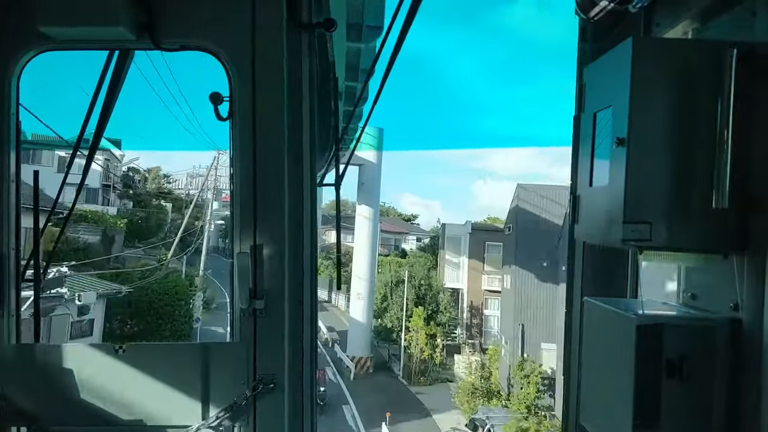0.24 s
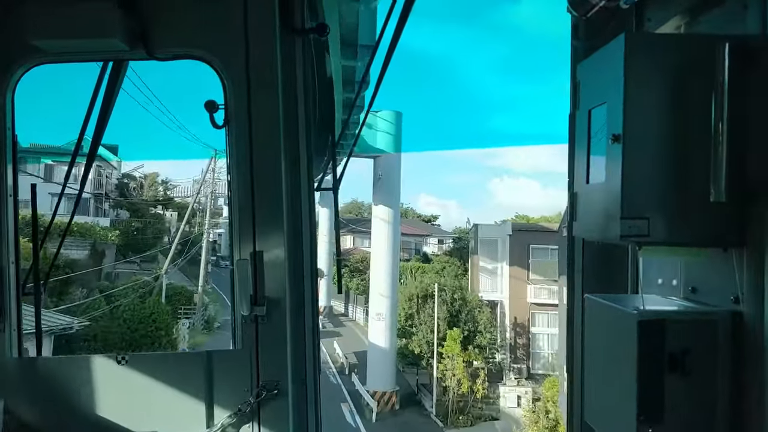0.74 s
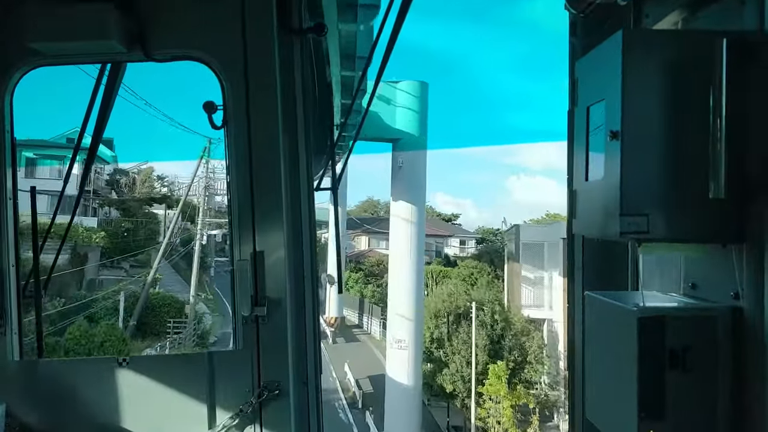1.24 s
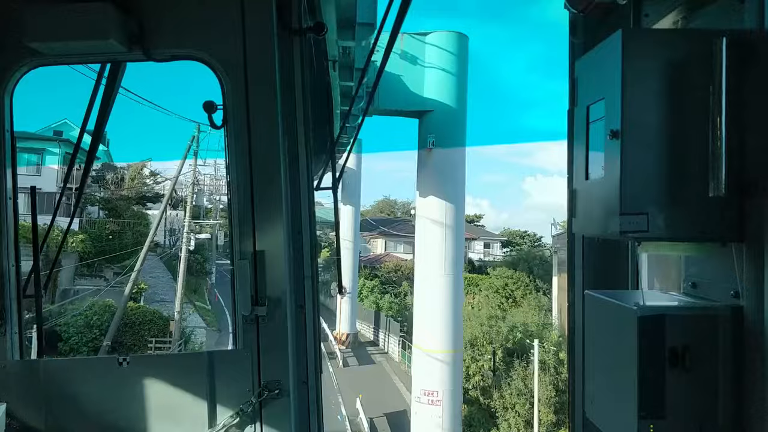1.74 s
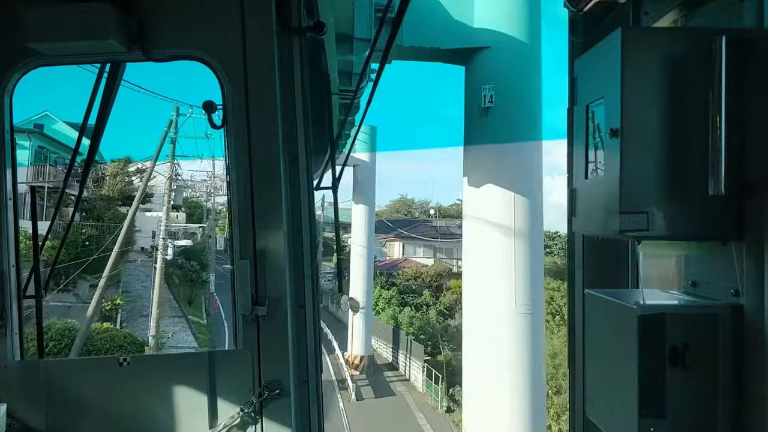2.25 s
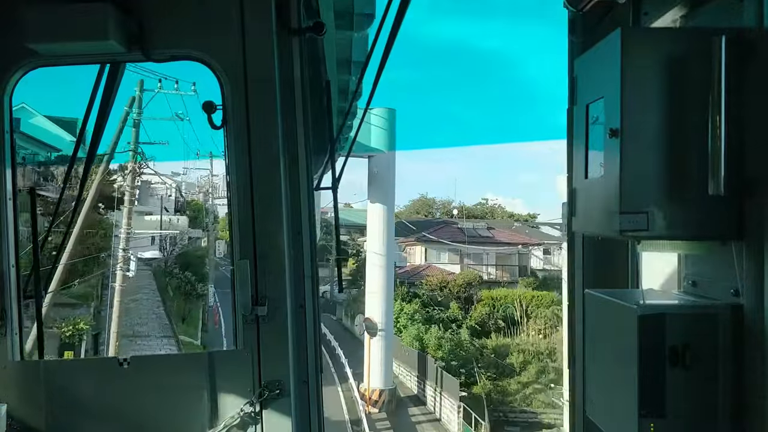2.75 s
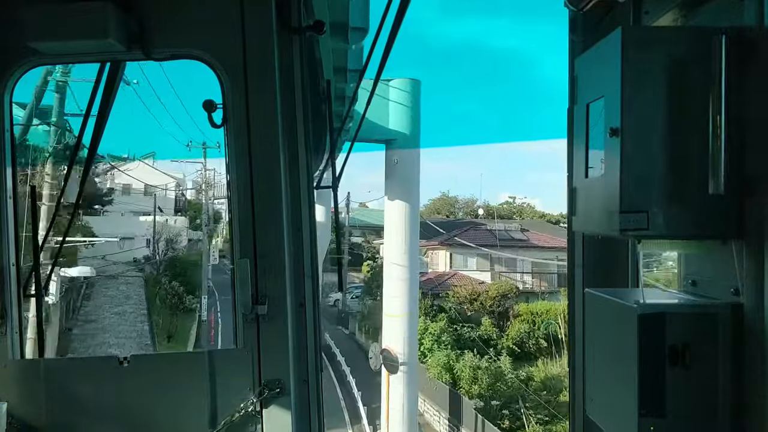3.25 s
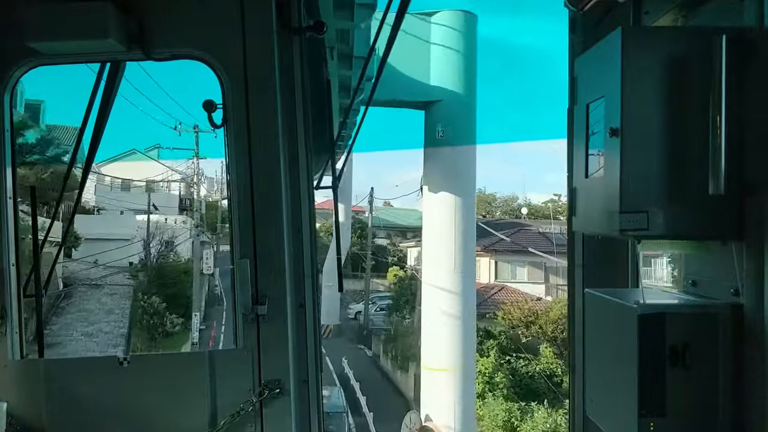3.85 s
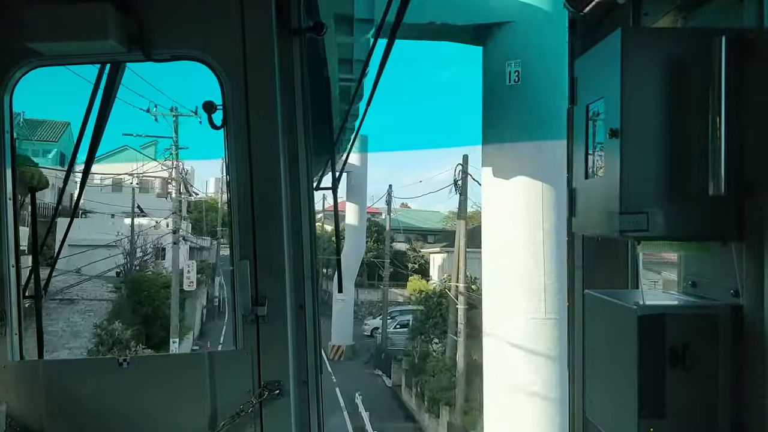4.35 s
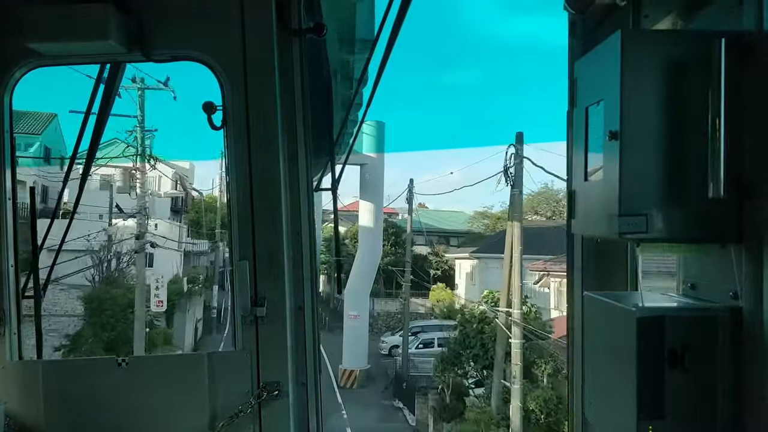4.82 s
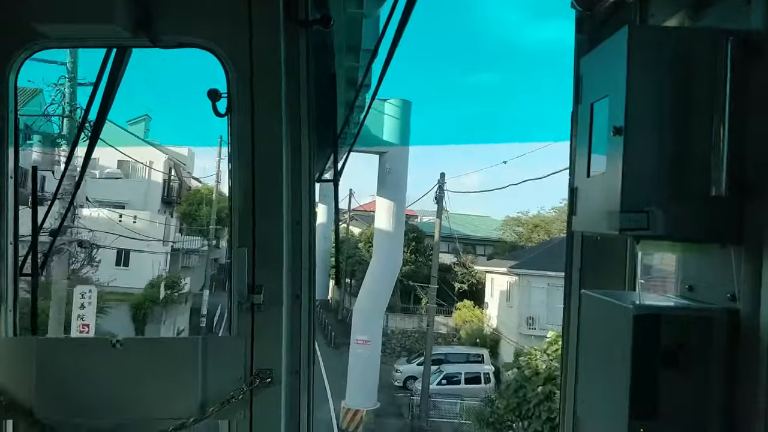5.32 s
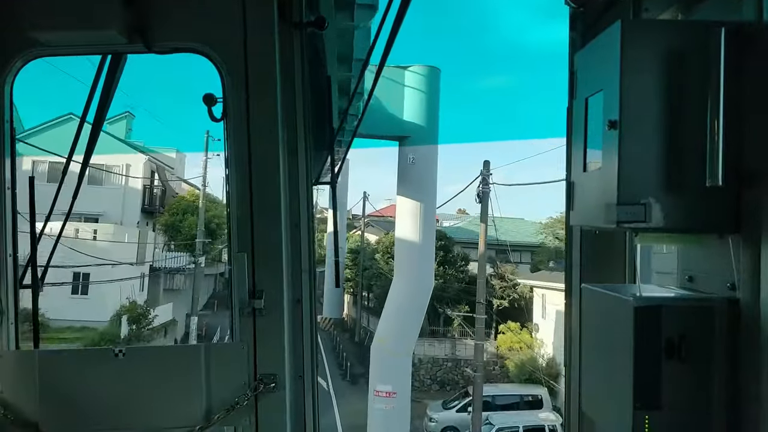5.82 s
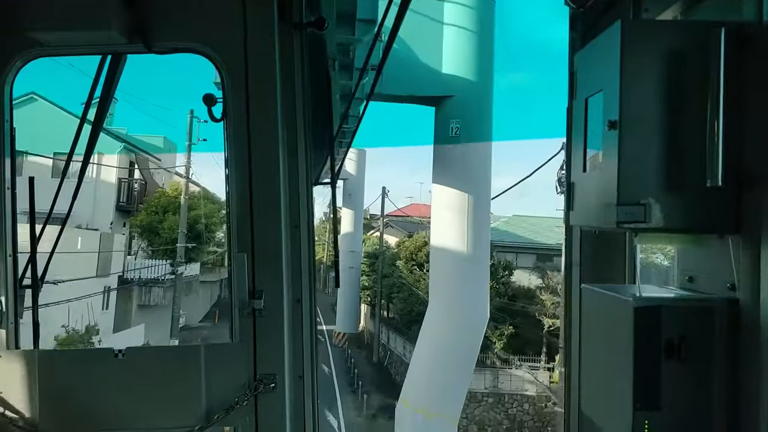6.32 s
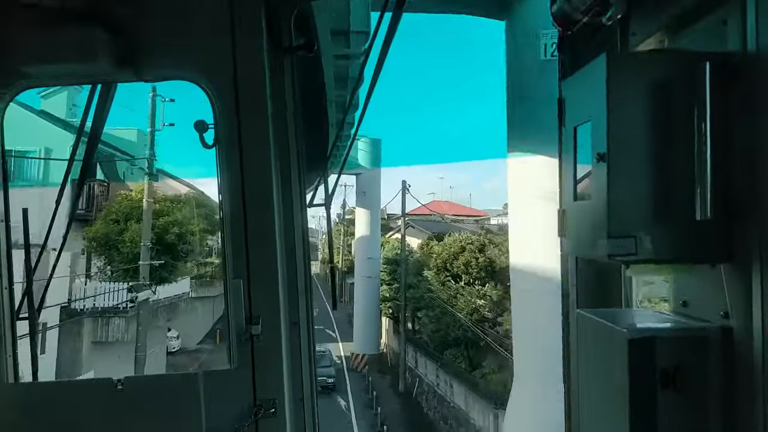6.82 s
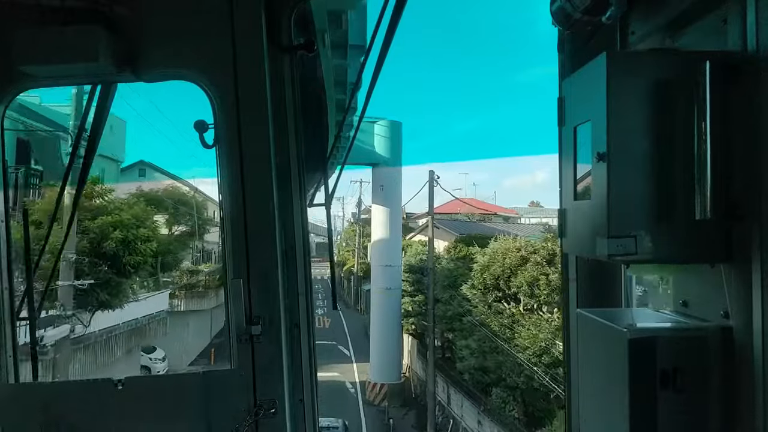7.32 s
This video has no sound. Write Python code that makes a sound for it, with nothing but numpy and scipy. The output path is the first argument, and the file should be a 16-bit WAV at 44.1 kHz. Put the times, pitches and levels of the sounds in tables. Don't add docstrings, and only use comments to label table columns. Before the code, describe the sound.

Low, swaying train rumble fills a cabin while wheel bumps knock the panels and close trim clicks, rubs and rattles over soft air hiss.

```python
import sys
import numpy as np
from scipy import signal
from scipy.fft import rfft, irfft, next_fast_len
from scipy.io import wavfile
from scipy.ndimage import uniform_filter1d

SR = 44100
rng = np.random.default_rng(int(sys.argv[2]) if len(sys.argv) > 2 else 0)


def boost_factor(decibels):
    exponent = np.asarray(decibels, float) / 20
    return 10 ** exponent


def materialize(psi):
    bounded = np.clip(np.atleast_2d(psi).T, -1, 1)
    quanta = np.round(bounded * 32767).astype(np.int16)
    wavfile.write(sys.argv[1], SR, quanta)


N = 333837

# frequency in Hz, level in dB per Hz.
AIR_SPECTRUM = [(1120, 3), (1900, 3.5), (2720, 1), (3810, 2), (5050, -0.5), (6140, -8), (7090, -8),
                (8500, -18), (11000, -61), (18700, -120)]
# frequency in Hz, level in dB per Hz.
FIZZ_SPECTRUM = [(3000, -99), (7000, -35), (8700, -19.5), (10300, -12), (12000, -10), (14500, -10),
                 (16000, -15)]
# frequency in Hz, level in dB per Hz.
SWAY_SPECTRUM = [(8, -25), (18, -1), (30, 0), (42, -2), (54, -30), (90, -130)]
# frequency in Hz, level in dB per Hz.
HUM_SPECTRUM = [(12, -130), (36, -30), (46, -5), (53, -4), (59, 0), (66, -3), (82, -5), (100, -13),
                (125, -40), (200, -130)]
# frequency in Hz, level in dB per Hz.
TYRE_SPECTRUM = [(53, -19), (90, -1), (241, -7.5), (357, -8), (385, -10), (454, -16), (496, -14),
                 (623, -14), (834, -27.5), (900, -22), (1050, -27.5), (1850, -39), (2400, -85),
                 (4070, -120)]
# frequency in Hz, width in Hz, rise in dB.
PANEL_MODES = [(170, 25, 4), (388, 10, 9), (497, 24, 7), (555, 20, 3), (640, 20, 8), (740, 30, 5),
               (890, 25, 5)]
# time in seconds, beam roughness in dB, cabin shaking in dB.
RIDE_ALONG_BEAM = [(0, -3.5, -0.5), (.34, -2, 0), (.91, -3.5, -2), (1.43, 4, 2), (1.94, -2, -1.5),
                   (2.75, -1.5, -1.5), (3.4, -5, -1), (3.86, 3, -2), (4.2, -1.5, -1.5), (4.64, 2.5, 1.5),
                   (4.95, -3.5, -2), (5.4, 3.5, 4.5), (5.75, -3.5, 0.5), (6.07, 5.5, 2), (6.68, -1, 3),
                   (6.92, -1, 0), (7.25, 0.6, -1), (7.57, -5.5, -6.5)]
# start in seconds, peak in dB, ring in Hz.
WALL_KNOCKS = [(0.185, -10, 498), (1.114, -10.5, 457), (1.431, -8.5, 587), (1.593, -7, 511),
               (2.14, -12.5, 501), (2.386, -12, 617), (2.472, -12, 472), (2.765, -12.5, 534),
               (3.416, -12, 633), (3.645, -13, 633), (3.752, -3, 527), (3.878, -5, 607), (4.381, -4.5, 507),
               (4.707, -8, 430), (5.313, -5.5, 450), (5.445, -10, 636), (5.638, -7.5, 493),
               (5.95, -6.5, 503), (6.065, -3.5, 538), (6.09, -10.5, 520), (1.452, -9.5, 603),
               (4.685, -10, 555), (4.405, -9.5, 484), (5.975, -12, 437), (6.285, -12, 635),
               (4.025, -13, 597), (1.522, -16, 560), (4.134, -15.5, 600), (4.259, -13.5, 637),
               (6.631, -14, 562), (6.332, -18, 596), (6.408, -7, 537), (6.451, -7, 493), (6.513, -4.5, 496),
               (6.576, -8, 497), (7.078, -9, 493)]
# start in seconds, peak in dB, ring in Hz.
FLOOR_THUDS = [(0.24, -13, 292), (0.3, -15.5, 275), (0.43, -20, 207), (2.3, -15, 280), (3.67, -13.5, 235),
               (1.83, -18, 204), (2.16, -17, 175), (6.04, -9.5, 298), (6.36, -9, 264), (0.359, -13, 356),
               (0.949, -11.5, 412), (1.06, -12.5, 296), (1.257, -13.5, 323), (1.298, -9, 280),
               (1.518, -22, 355), (1.652, -13, 258), (1.735, -10, 393), (1.998, -12.5, 330),
               (2.251, -19, 386), (2.718, -17, 407), (3.02, -16, 396), (3.484, -11.5, 316),
               (4.003, -9.5, 406), (4.129, -15.5, 342), (4.15, -11, 395), (4.428, -15, 392),
               (4.5, -11.5, 286), (4.65, -13, 363), (4.803, -13, 288), (4.925, -12, 356),
               (5.051, -11.5, 268), (5.189, -10, 337), (5.407, -12.5, 256), (5.506, -7, 288),
               (5.599, -15, 360), (5.658, -6.5, 432), (5.726, -19, 414), (6.088, -15, 410),
               (6.129, -13.5, 265), (6.595, -9.5, 290), (6.63, -14, 300), (6.858, -12, 260),
               (7.357, -12, 335), (7.439, -20, 420)]
# start in seconds, peak in dB, centre in Hz, length in seconds.
TRIM_RUSTLES = [(1.425, -48, 3800, 0.045), (3.765, -41, 4000, 0.05), (5.609, -39.5, 3980, 0.07),
                (5.652, -43.5, 4000, .05), (5.935, -40, 3800, 0.07), (6.63, -44, 5000, .025),
                (6.675, -43, 4500, 0.083), (6.81, -42, 4400, .06), (6.937, -54, 3500, .03),
                (4.498, -41, 4200, 0.057), (5.029, -45, 4500, 0.033), (7.043, -45, 3480, 0.057),
                (7.083, -42.5, 3200, 0.061)]
# start in seconds, peak in dB, brightness in dB.
LEFT_SNAPS = [(.2523, -31, -16), (.3177, -32, -11), (.5272, -26.5, -8.5), (.6265, -30.5, -16),
              (.7053, -31, -21), (.9332, -28, -17), (1.0595, -25, -18), (1.614, -29, -21),
              (1.7933, -22.5, -14.5), (2.2293, -30, -16), (2.2947, -41, 2), (2.371, -35, -9),
              (2.5722, -32, -10), (2.8195, -24.5, -9), (3.0126, -26, -18), (3.3613, -24.5, -21),
              (3.8496, -42, -3), (4.0602, -25.5, -16), (4.3959, -23.5, -16), (4.4687, -31.5, -10),
              (4.5511, -27.5, -13), (4.8748, -40, -7), (4.9254, -25.5, -13), (5.1208, -29, -16),
              (5.1906, -20, -15.5), (5.3538, -28.5, -1), (6.2987, -30.5, -10), (7.012, -24.5, -18),
              (7.3582, -30, -14)]
# start in seconds, peak in dB, brightness in dB.
RIGHT_SNAPS = [(.1511, -29, -19), (.8664, -36, -14), (4.6458, -28, -14), (5.0955, -31, -10),
               (6.5799, -36, -4), (6.638, -50, 2), (6.68, -42, 2), (7.097, -31, -16), (7.3495, -29, -8),
               (1.682, -34, -16), (4.917, -38, -2), (5.321, -38, 0), (7.54, -38, -8), (6.412, -42, -3),
               (4.013, -36, -10), (7.4135, -44, -12), (1.9974, -32, -11), (2.0812, -34, -14),
               (2.641, -25, -26), (2.7003, -37, -24), (3.3019, -33, -14), (3.5124, -32, -7),
               (3.9872, -41, -10), (4.2547, -50, -3), (5.036, -43, -3), (5.0517, -25.5, -15),
               (5.079, -24.5, -4), (5.1537, -37, 8), (5.6131, -33, -3), (5.9214, -42, 5),
               (6.3765, -24, -26), (6.5111, -22, -15), (6.9481, -28, -19)]
# start in seconds, peak in dB, lowest mode in Hz, brightness in dB,
# left minus right in dB.
DULL_TAPS = [
    (5.133, -22.5, 1500, -23, 8),
    (5.4385, -19, 1160, -24, -2),
    (5.505, -19.5, 1120, -22, 2),
]
# start in seconds, peak in dB, 60 dB decay in seconds.
CLIP_PINGS = [(.2129, -42, 0.11), (.7193, -47, 0.031), (1.6242, -45, .13), (1.7654, -44, 0.33),
              (1.8297, -41.5, 0.21), (2.1011, -41, .11), (2.1485, -39, 0.044), (2.2069, -42, .035),
              (2.2383, -38, .09), (2.3645, -39.5, 0.17), (2.5107, -41, 0.044), (2.6165, -43, .035),
              (2.821, -32.5, 0.26), (3.0011, -42, .14), (3.1113, -43, .04), (3.4481, -42, .09),
              (3.713, -39, 0.11), (4.157, -44, 0.038), (4.2237, -33, 0.12), (4.509, -34, 0.096),
              (4.7386, -39, .09), (4.7566, -42, 0.21), (4.918, -36.5, 0.11), (4.581, -52, .035),
              (5.076, -43, 0.032), (5.386, -39, .04), (5.459, -47, .3), (5.602, -38, 0.17),
              (5.662, -42, 0.18), (6.1399, -43, 0.27), (1.94, -46, .05), (2.729, -48, .04),
              (2.783, -46, .05), (2.867, -43, .05), (2.989, -46, .03), (3.902, -51, .04), (4.47, -49, .04),
              (4.087, -48, .05), (5.319, -36, .06), (6.272, -42, .1), (6.532, -39, .05), (6.71, -41, 0.22),
              (6.783, -39, 0.13)]
# start in seconds, peak in dB, 60 dB decay in seconds.
FITTING_CHATTERS = [(0.042, -38, 0.2), (.28, -44, .3), (.3491, -36, 0.13), (.9363, -41, .3),
                    (1.3518, -33, 0.2), (2.2952, -43, .3), (2.8659, -44, .3), (3.299, -34, 0.35),
                    (3.499, -32.5, 0.39), (3.6157, -45, .3), (3.753, -39, .15), (3.776, -33, 0.43),
                    (4.065, -49, .3), (4.257, -33.5, .3), (4.384, -33, 0.38), (4.786, -33.5, 0.2),
                    (5.128, -49, .2), (5.1527, -35, .25), (5.234, -39, .3), (5.266, -45, .3),
                    (5.355, -35, .3), (5.5159, -44, .3), (5.715, -34, .3), (5.92, -33, 0.36),
                    (6.0153, -35.5, .3), (6.227, -38.5, .25), (6.4812, -41, .3), (6.5834, -37, 0.32),
                    (6.672, -43, 0.45), (7.062, -46, .3), (7.0883, -38, 0.22), (7.124, -33, .3),
                    (7.271, -32, 0.18), (7.522, -34, 0.18)]
# start in seconds, peak in dB, pitch in Hz, length in seconds.
FITTING_SQUEAKS = [
    (0.276, -48, 13500, 0.068),
    (0.592, -54, 13500, 0.019),
]
# frequency in Hz, side minus mid in dB.
STEREO_SPREAD = [(42, -25), (65, -17), (125, -8), (250, -5.7), (500, -5.2), (1000, -.3), (16000, 0)]
# frequency in Hz, left minus right in dB.
PORT_MISMATCH = [(25, .5), (60, 1), (200, 2), (600, 1.5), (1300, .3), (4400, .8), (9500, 0), (12500, 6),
                 (14500, 11.5), (15600, 8)]

AIR_DB, FIZZ_DB, FIZZ_FOLLOWS = -44.5, -59, 1.6
SWAY_DB, HUM_DB, ROAR_DB = -17.5, -18.5, -19
HUM_GROWS_DB_PER_S, HUM_FOLLOWS = 0.26, 0.066
FLOOR_TOP_HZ, FLOOR_FOLLOWS, WALLS_FOLLOW = 280, 0.79, 0.72
DRONE_HZ, DRONE_WANDER_HZ, DRONE_DB, DRONE_FROM_S, DRONE_RISE_S = 58.3, 1.1, -21, 2.2, 1.2
RING_HZ, RING_SHARE, DULL_HZ, BUZZ_LATE_S = 633, 0.36, 713, 0.0011
LEFT_HZ, LEFT_PAN_DB, RIGHT_HZ, RIGHT_PAN_DB, TRIM_SPREAD = 2260, 13.5, 2060, -1.5, 0.023
RING_T60_S, MODE_RING, TRIM_TOP_HZ = 0.015, 0.55, 6900
PING_HZ, CHATTER_HZ, TICK_T60_S, SWELL_S = 10600, 14400, 0.017, 0.0022
SOFT_DB, HZ_PER_DB, FRAME_DB, FRAME_PER_DB = -34.5, 103, 3, 2.45


def evened(x):
    return x / np.sqrt(np.mean(x ** 2) + 1e-20)


def smooth_twice(x, size):
    return uniform_filter1d(uniform_filter1d(x, size=size), size=size)


def read(points, hz):
    f, value = np.transpose(points)
    return np.interp(np.log(hz + 1), np.log(f + 1), value)


def level(db, follows, order):
    rows = np.array(RIDE_ALONG_BEAM)
    return boost_factor(db + follows * np.interp(np.arange(N) / SR, rows[:, 0], rows[:, order]))


def add(mix, s, sound):
    part = mix[:, max(round(s * SR), 0):][:, :sound.shape[-1]]
    part += sound[:, :part.shape[1]]


def band(x, hz, width):
    return signal.lfilter(*signal.iirpeak(min(hz, .45 * SR), hz / width, SR), x)


def twice(x, hz, width, second_hz, second_width):
    return evened(band(band(x, hz, width), second_hz, second_width))


def low_pass(x, order, hz):
    return signal.sosfilt(signal.butter(N=order, Wn=hz, fs=SR, output="sos"), x)


def noise(shape, size, patchy_db, flicker_db, peaks=()):
    frames, hz = 4 * N // size + 5, np.fft.rfftfreq(size, 1 / SR)
    a, b, c, d, patches = rng.standard_normal((frames, len(hz), 5)).T
    patches = evened(uniform_filter1d(uniform_filter1d(patches, size=8, axis=0), size=8, axis=1))
    flicker = evened(uniform_filter1d(rng.standard_normal(frames), size=4))
    db = read(shape, hz) + sum(g / (1 + (2 * (hz - f) / w) ** 2) for f, w, g in peaks)
    side = boost_factor(2 * read(STEREO_SPREAD, hz))
    same = np.clip((1 - side) / (1 + side), -1, 1)[:, None]
    left = a + 1j * b
    right = same * left + np.sqrt(1 - same ** 2) * (c + 1j * d)
    z = np.array([left, right]) * boost_factor(db[:, None] + patchy_db * patches + flicker_db * flicker)
    return evened(signal.istft(z, nperseg=size, noverlap=size * 3 // 4)[1][:, :N])


def bounded(x):
    swing = smooth_twice((x ** 2).mean(axis=0), 2500)
    return evened(x / (swing + .05) ** .3)


def scattered(rows, hz, spread):
    return [(*row, hz * (1 + spread * u)) for row, u in zip(rows, rng.uniform(-0.79, 1, len(rows)))]


def hiss():
    air = noise(AIR_SPECTRUM, size=1024, patchy_db=1.3, flicker_db=1.2)
    fizz = noise(FIZZ_SPECTRUM, size=256, patchy_db=1, flicker_db=2)
    return level(AIR_DB, 1, order=2) * air + level(FIZZ_DB, FIZZ_FOLLOWS, order=2) * fizz


def car_body():
    sway = bounded(noise(SWAY_SPECTRUM, size=8192, patchy_db=0, flicker_db=0))
    hum = bounded(noise(HUM_SPECTRUM, size=8192, patchy_db=0, flicker_db=0))
    roar = noise(TYRE_SPECTRUM, size=4096, patchy_db=1.2, flicker_db=.4, peaks=PANEL_MODES)
    floor = signal.sosfiltfilt(signal.butter(N=2, Wn=FLOOR_TOP_HZ, fs=SR, output="sos"), roar)
    walls = roar - floor
    heavy = floor.std() * bounded(floor)
    hum_db = HUM_DB + HUM_GROWS_DB_PER_S * (np.arange(N) - N / 2) / SR
    return (boost_factor(SWAY_DB) * sway
            + level(hum_db, HUM_FOLLOWS, order=1) * hum
            + level(ROAR_DB, WALLS_FOLLOW, order=1) * walls
            + level(ROAR_DB, FLOOR_FOLLOWS, order=1) * heavy)


def drone():
    t = np.arange(N) / SR
    wander, swell = [evened(smooth_twice(u, 5000)) for u in rng.standard_normal((2, N))]
    tone = np.sin(2 * np.pi * np.cumsum(DRONE_HZ + DRONE_WANDER_HZ * wander) / SR)
    rise = np.clip((t - DRONE_FROM_S) / DRONE_RISE_S, 0, 1)
    return boost_factor(DRONE_DB + 3.4 * swell) * rise * tone


def bumps():
    shared, *apart = rng.standard_normal((3, N))
    shudder = shared + .7 * np.array(apart)
    panels = sum(band(shudder, f, 2 * w) for f, w, _ in PANEL_MODES[:-1])
    body = evened(panels) + 2.09 * evened(band(shudder, 397, 140))
    buzz = twice(rng.standard_normal((2, N)), 1350, 900, 1350, 900)
    knocks, power, t = np.zeros((1, N)), np.zeros((1, N)), np.arange(6000) / SR
    for s, db, hz in list(WALL_KNOCKS) + list(FLOOR_THUDS):
        ring = np.sin(2 * np.pi * hz * t) + RING_SHARE * np.sin(2 * np.pi * RING_HZ * t)
        add(knocks, s, boost_factor(db - 6.5 - 60 * t / 0.1)[None] * ring)
        add(power, s, boost_factor(db - 15.5 - 60 * t / 0.25)[None] ** 2 * np.minimum(t / 0.0026, 1))
    dulled = low_pass(knocks + np.sqrt(power) * body, 3, DULL_HZ)
    slow = np.exp(-1 / (BUZZ_LATE_S * SR))
    lining_power = signal.lfilter([1 - slow], [1, -slow], power)
    return dulled + boost_factor(-15.0) * np.sqrt(lining_power) * buzz


def rustles():
    out = np.zeros((2, N))
    for s, db, hz, length in TRIM_RUSTLES:
        u = np.arange(6000) / (length * SR)
        grain = boost_factor(3 * evened(uniform_filter1d(rng.standard_normal(len(u)), size=60)))
        scrape = band(band(rng.standard_normal((2, len(u))), hz, 2600), hz, 3500)
        rub = evened(scrape * grain)
        add(out, s, boost_factor(db) * rub * np.minimum(u / .12, 1) * np.exp(-1.6 * u ** 2))
    return out


def ticks():
    out, t = np.zeros((2, N)), np.arange(2400) / SR
    impulse = 1. * (np.arange(len(t)) == 30)
    click = band(band(impulse, 3600, 5000), 3600, 5000)
    click = click / abs(click).max()
    grip = t / .0008 * np.exp(1 - t / .0008)
    left = [(s, db, hz, b, LEFT_PAN_DB) for s, db, b, hz in scattered(LEFT_SNAPS, LEFT_HZ, TRIM_SPREAD)]
    right = [(s, db, hz, b, RIGHT_PAN_DB) for s, db, b, hz in scattered(RIGHT_SNAPS, RIGHT_HZ, TRIM_SPREAD)]
    for s, db, hz, bright_db, pan_db in left + right + list(DULL_TAPS):
        crack = twice(rng.standard_normal(len(t)), 4300, 3600, 4200, 3400)
        crack = crack / np.sqrt((grip * crack ** 2).sum() / grip.sum())
        mode = np.sin(2 * np.pi * hz * t)
        body = 1.3 * np.sin(2 * np.pi * .55 * hz * t) + .45 * np.sin(2 * np.pi * 2.3 * hz * t)
        snap = grip * (0.5 * mode + 2.3 * boost_factor(bright_db) * crack + 0.7 * body)
        snap = snap + MODE_RING * np.minimum(t / 0.0047, 1) * boost_factor(-60 * t / RING_T60_S) * mode
        snap = snap + 3.0 * boost_factor(.6 * bright_db) * click
        walls = evened(band(rng.standard_normal((2, len(t))), 3200, 3000)) * boost_factor(-22 - 60 * t / .08)
        late = np.pad(snap, (4, 0))[:len(t)]
        pair = np.array([snap, late]) * boost_factor([[pan_db / 2], [-pan_db / 2]])
        add(out, s - .0002, boost_factor(db - 4.0) * (pair + walls))
    return low_pass(out, 6, TRIM_TOP_HZ)


def rattles():
    out, t = np.zeros((2, N)), np.arange(6000) / SR
    pings = [(*row, PING_HZ) for row in CLIP_PINGS]
    chatters = [(s, db, t60, CHATTER_HZ + HZ_PER_DB * (db - SOFT_DB)) for s, db, t60 in FITTING_CHATTERS]
    for s, db, t60, hz in pings + chatters:
        contacts = rng.standard_normal((2, len(t)))
        chatter = boost_factor(1.3 * evened(uniform_filter1d(rng.standard_normal(len(t)), size=90)))
        wide = twice(contacts, 12500, 5700, 13200, 6400)
        first = twice(contacts, PING_HZ, 1600, PING_HZ, 2400) + .6 * wide
        colour = first if hz == PING_HZ else twice(contacts, hz, 3200, hz, 4000) + wide
        frame_db = FRAME_DB + FRAME_PER_DB * (db - SOFT_DB)
        frame = boost_factor(frame_db) * twice(contacts, 4400, 3500, 3000, 3200)
        swell = 0.43 + 0.52 * np.minimum(t / SWELL_S, 1)
        tail = 0.65 * chatter * boost_factor(-60 * t / np.clip(t60, .03, .45)) * swell
        tick = (0.9 * first + 0.6 * colour) * boost_factor(-60 * t / TICK_T60_S)
        behind = frame * tail * np.minimum(t / 0.0017, 1)
        sound = tick + colour * tail + behind
        add(out, s, boost_factor(db - 11.0) * sound * np.minimum(t / 0.00059, 1))
    return out


def squeaks():
    out, t = np.zeros((2, N)), np.arange(6000) / SR
    for s, db, hz, length in FITTING_SQUEAKS:
        slips = .7 + .3 * np.cos(2 * np.pi * 75 * t)
        rub = twice(rng.standard_normal((2, len(t))), hz, 400, hz, 500) * slips
        add(out, s, boost_factor(db - 60 * np.maximum(t - length, 0) / 0.055) * rub)
    return out


def scene():
    return hiss() + car_body() + drone() + bumps() + rustles() + ticks() + rattles() + squeaks()


def top_cut(x):
    return signal.sosfilt(signal.butter(12, 15770, fs=SR, output="sos"), x)


def record(dry):
    size = next_fast_len(N)
    hz = np.fft.rfftfreq(size, 1 / SR)
    ports = boost_factor(np.multiply.outer([.5, -.5], read(PORT_MISMATCH, hz))) * (hz < 15850)
    limited = 1.2 * np.tanh(dry / 1.2)
    mix = irfft(rfft(limited, size) * ports, size)[:, :N]
    return top_cut(mix)


dry = scene()
out = record(dry)
materialize(out)
```